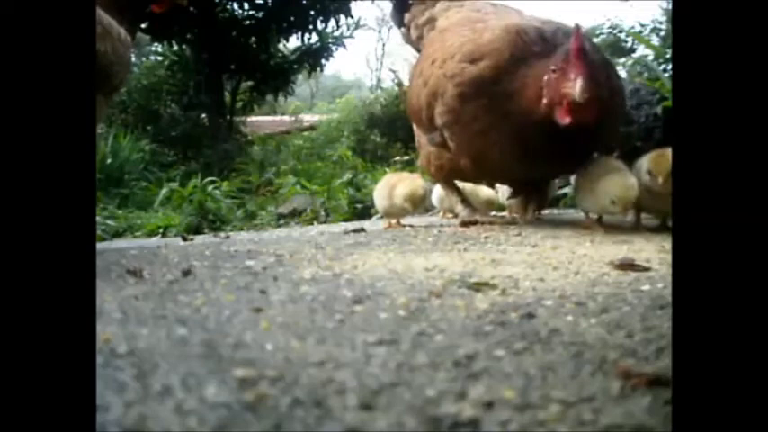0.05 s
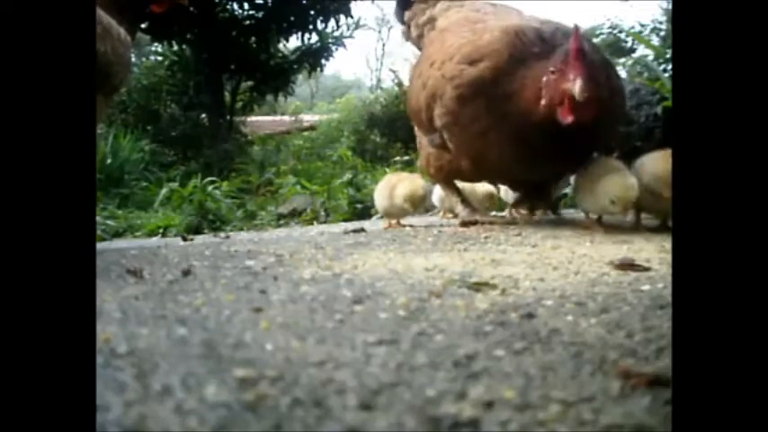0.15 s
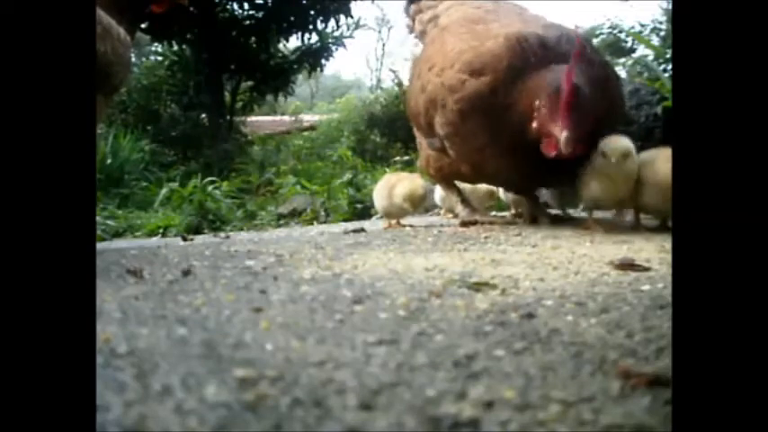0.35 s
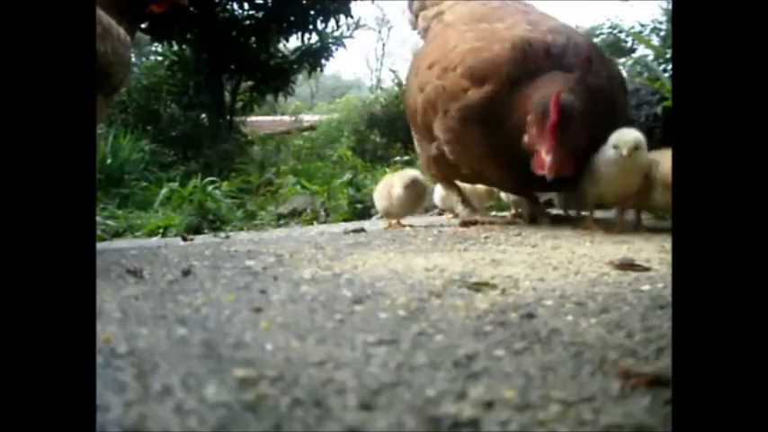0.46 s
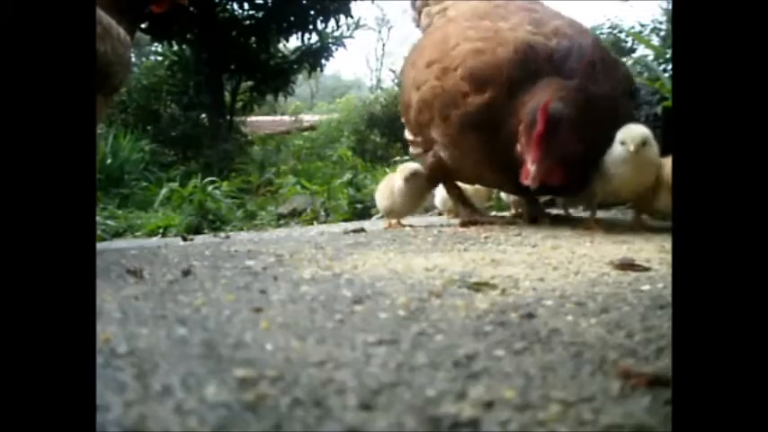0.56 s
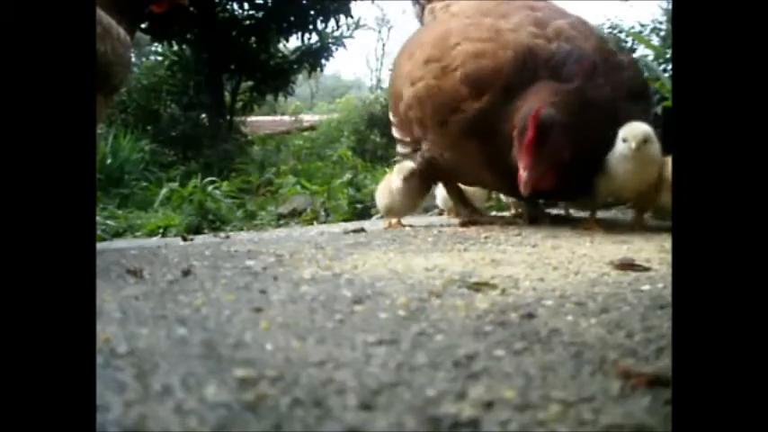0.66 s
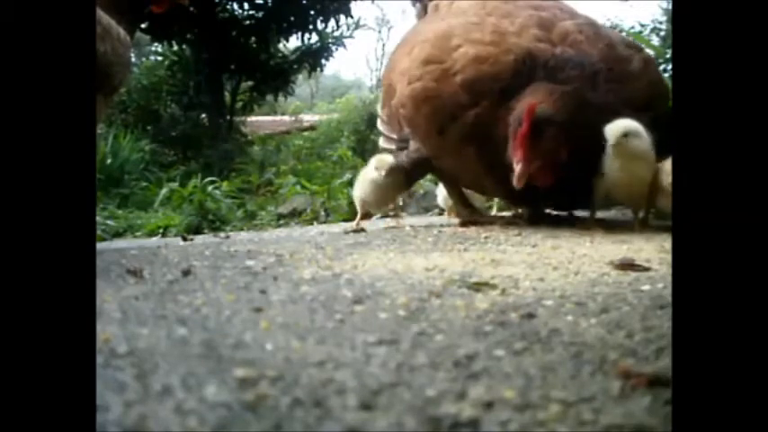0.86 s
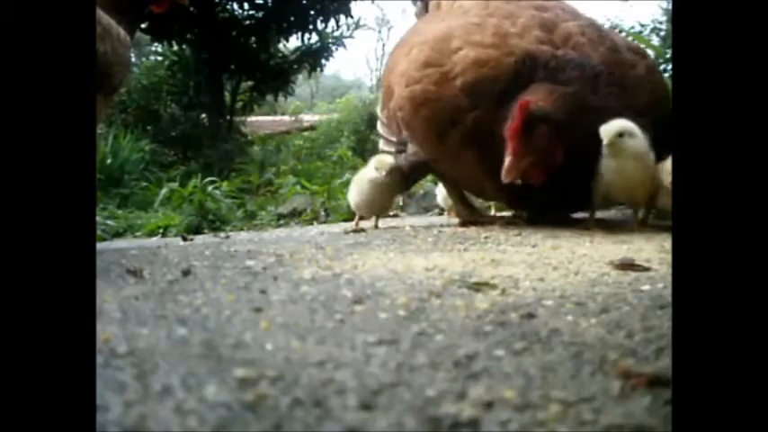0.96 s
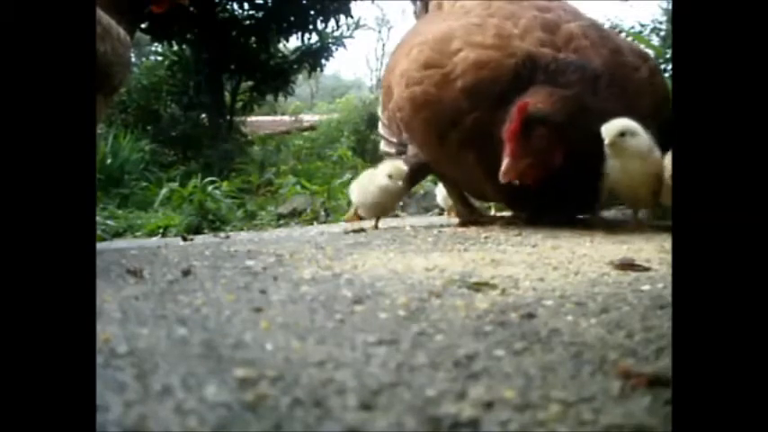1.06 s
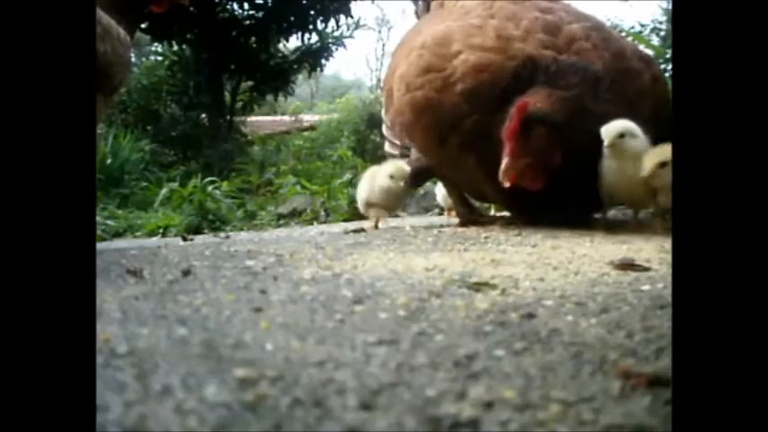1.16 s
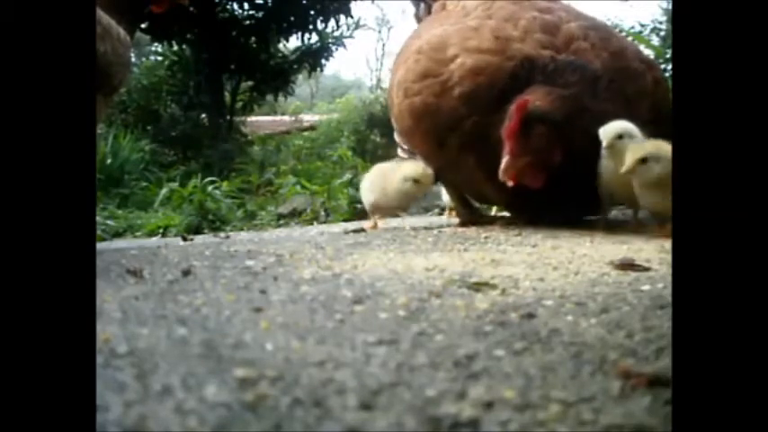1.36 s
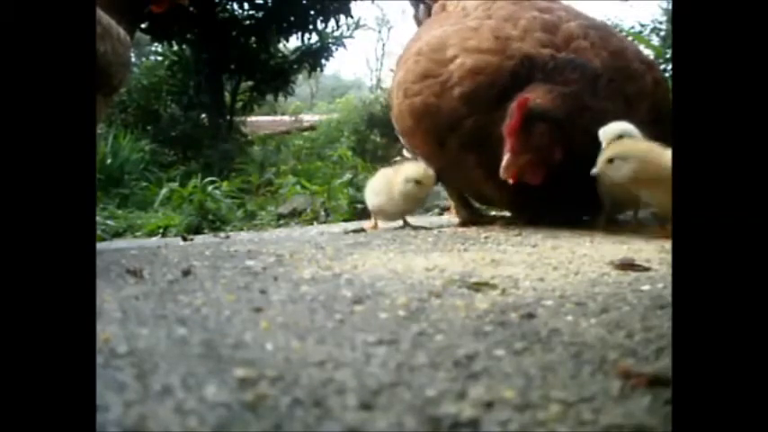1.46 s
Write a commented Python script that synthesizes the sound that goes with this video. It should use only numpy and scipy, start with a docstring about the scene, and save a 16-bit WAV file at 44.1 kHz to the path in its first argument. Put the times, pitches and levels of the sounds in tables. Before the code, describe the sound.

One loud, raspy hen squawk, followed by faint chick peeps and a quick cluck.

```python
"""Over a garden's steady hush a hen murmurs softly, and a beak taps the concrete yard.
She gives one loud, harsh squawk: a short clear note, then a fluttering cry that sinks into a rasp as
her voice turns from periodic to chaotic vibration. After another tap her chicks peep in nearly pure
gliding tones, and she clucks once among them. A wall returns one faint echo, and a small
narrow-band recorder close by on the ground cuts the treble."""
import sys
import numpy as np
from scipy import signal
from scipy.fft import rfft, irfft
from scipy.io import wavfile
from scipy.ndimage import uniform_filter1d

SR = 44100
rng = np.random.default_rng(int(sys.argv[2]) if len(sys.argv) > 2 else 0)


def int16_out(signal):
    """Quantize to a 16-bit WAV file."""
    q = np.round(np.clip(np.atleast_2d(signal).T, -1, 1) * 32767)
    wavfile.write(sys.argv[1], SR, q.astype(np.int16))


N = 66150
TIME = np.arange(N) / SR
RECORDER_RATE_HZ = 8000


def from_db(db):
    """Amplitude ratio of a level in decibels."""
    return 10 ** (np.asarray(db) / 20)


def unit_rms(x):
    """Normalisation to unit mean power."""
    return x / np.sqrt(np.mean(x ** 2) + 1e-20)


def in_time(rows):
    """Linear interpolation of each column over time."""
    times, *columns = np.transpose(rows)
    return [np.interp(TIME, np.sort(times), column) for column in columns]


def during(rows):
    """Rectangular window: one while a curve lasts, zero outside it."""
    return (TIME >= rows[0][0]) & (TIME <= rows[-1][0])


def butter(x, hz, kind, order=2):
    """Causal Butterworth filter."""
    return signal.sosfilt(signal.butter(order, hz, kind, fs=SR, output="sos"), x + 1e-18)


def drift(hz):
    """Random fluctuation: low-passed noise of rms 1."""
    return unit_rms(butter(rng.standard_normal(2 * N), hz, "low")[N:])


def tone(hz):
    """A sinusoid of rms 1 whose phase is the integral of its frequency."""
    return np.sqrt(2) * np.sin(2 * np.pi * np.cumsum(hz) / SR)


def note(rows, jitter):
    """Frequency modulation: a gliding tone wavers at random by a fraction of its pitch."""
    hz, db = in_time(rows)
    return from_db(db) * during(rows) * tone(hz * (1 + jitter * drift(200)))


# Outdoor background spectrum (frequency [Hz], relative spectral density [dB])
GARDEN_SPECTRUM = [(20, -6), (60, -1), (175, 0), (375, -4), (700, -7), (1030, -8), (1550, -10.5),
                   (3000, -11), (4000, -14)]


def garden():
    """Spectrally shaped noise: a steady hush with a low rumble."""
    hz, db = np.transpose(GARDEN_SPECTRUM)
    bin_hz = np.maximum(np.arange(N // 2 + 1) * SR / N, 1)
    shape = from_db(np.interp(np.log(bin_hz), np.log(hz), db)) * (bin_hz < RECORDER_RATE_HZ / 2)
    hush = irfft(rfft(rng.standard_normal(N)) * shape, N)
    return from_db(-43.5) * unit_rms(hush)


# The hen's murmur (time [s], frequency [Hz], level [dB])
MURMUR_CONTOUR = [(.08, 520, -56), (.11, 565, -38), (.128, 685, -53.5), (.155, 560, -45.5), (.18, 540, -52)]


def murmur():
    """Nearly periodic vibration: one soft, unsteady tone."""
    return note(MURMUR_CONTOUR, jitter=0.025)


# Beak impacts on the ground (time [s], initial level before filtering [dB], frequency [Hz])
BEAK_IMPACTS = [(0.2097, -15.5, 600), (0.8564, -25, 1110)]


def pecks(t60_s=0.01):
    """Damped oscillation: each impact gives a dull tap that dies within a few cycles."""
    taps = np.zeros(N)
    for onset, db, hz in BEAK_IMPACTS:
        age = np.maximum(TIME - onset, 0)
        taps += from_db(db - 60 * age / t60_s) * np.sin(2 * np.pi * hz * age)
    return butter(butter(taps, 1390, "low", order=4), 280, "high")


def rasp(centre_hz, width_hz=260):
    """Chaotic vibration, modelled as narrow-band noise around a moving frequency."""
    centred = drift(width_hz) * tone(centre_hz)
    wandering = drift(width_hz) * tone(centre_hz + width_hz / 2 * drift(width_hz))
    return unit_rms(centred + wandering)


def throat(source):
    """Source-filter principle: the throat passes only a narrow middle band."""
    return butter(butter(source, 1422, "low", order=10), 370, "high", order=6)


# The squawk's fundamental (time [s], frequency [Hz])
SQUAWK_FUNDAMENTAL = [(.237, 520.9), (.255, 529.9), (.283, 521.7), (.31, 523.2), (.345, 545.2), (.38, 521),
                      (.41, 502.7), (.44, 481), (.47, 460.2), (.5, 434), (.56, 409.5), (.585, 385)]
# Its envelope before the throat (time [s], level [dB])
SQUAWK_ENVELOPE = [(.2345, -42), (.2365, -19), (.241, -17), (.248, -8), (.26, -8), (.266, -47), (.276, -25),
                   (.286, -10.5), (.309, -5.5), (.318, -9), (.341, -9.5), (.372, -10.5), (.395, -17.5),
                   (.442, -14.5), (.471, -21), (.479, -10.5), (.487, -21.5), (.52, -15), (.555, -17.5),
                   (.564, -11.5), (.576, -31), (.59, -71)]
# Its timbre, with levels relative to the second harmonic (time [s], fundamental [dB], sidebands [dB],
# sideband swing with the flutter [dB], sideband spacing [Hz], rasp [dB], flutter depth [share of pitch])
SQUAWK_TIMBRE = [(.238, -17.5, -5.5, -7, 418.8, -2, 0.0075), (.256, -29.5, -19.5, 3, 382.6, -26, .005),
                 (.29, -26, -17.5, 8.5, 247.4, -13, 0.063), (.31, -31.5, -12.5, 6, 270.3, -20.5, 0.041),
                 (.365, -62, -11.5, 2, 277.4, -18.5, 0.054), (.395, -6, -16.5, -6.5, 301.9, -20.5, 0.026),
                 (.425, -5.5, -26, -9.5, 258.8, -19.5, .025), (.447, -11.5, -7.5, 3.5, 207.3, -3, 0.05),
                 (.49, -8, -7, -1.5, 179.4, -14.5, 0.065), (.52, -22.5, 3, -7, 179.4, -1.5, 0.071),
                 (.57, -26.5, -4.5, -12, 159.7, -10.5, 0.056)]
# The flutter slows as she tires (time [s], rate [Hz])
SQUAWK_FLUTTER = [(.42, 56.7), (.44, 50)]


def squawk(jitter=0.016, shimmer_db=1.74, flutter_db=2.5):
    """Modulation: a fluttering voice, led by its second harmonic, sinks into sidebands and rasp."""
    pitch, = in_time(SQUAWK_FUNDAMENTAL)
    level_db, = in_time(SQUAWK_ENVELOPE)
    fundamental_db, side_db, swing_db, spacing_hz, rasp_db, depth = in_time(SQUAWK_TIMBRE)
    flutter_hz, = in_time(SQUAWK_FLUTTER)
    sounding = during(SQUAWK_ENVELOPE)
    flutter = np.cos(2 * np.pi * np.cumsum(flutter_hz * sounding) / SR)
    hz = pitch * (1 + depth * flutter + jitter * drift(120))
    harmonics = tone(2 * hz) + from_db(fundamental_db) * (tone(hz) + from_db(-8) * tone(3 * hz))

    offset_hz = spacing_hz * (1 + 0.14 * drift(90))
    side_gain = from_db(side_db + swing_db * flutter)
    near_sides = tone(2 * hz - offset_hz) - from_db(-12) * tone(2 * hz + offset_hz)
    far_side = side_gain * from_db(-10) * tone(2 * (hz - offset_hz))
    voice = harmonics + side_gain * (near_sides + far_side) + from_db(rasp_db) * rasp(1.8 * pitch)
    voice /= np.sqrt(uniform_filter1d(voice ** 2, int(0.009 * SR)) + 1e-9)   # even power over 9 ms

    effort = from_db(level_db - level_db.max())
    tremolo_db = flutter_db * np.sqrt(effort) * flutter
    envelope = from_db(level_db + tremolo_db + shimmer_db * drift(150)) * sounding
    air_hiss = unit_rms(butter(rng.standard_normal(N), 3160, "low", order=4))
    edge = from_db(-26) * air_hiss + from_db(-29) * tone(4 * hz)   # brightens the loud part
    return throat(envelope * voice) + envelope * effort * edge


# The chicks' calls, one curve per peep (time [s], frequency [Hz], level [dB])
PEEP_CONTOURS = [
    [(.875, 2480, -64), (.89, 2415, -48), (.908, 2476, -51), (.922, 3600, -43), (.934, 3860, -51),
     (.952, 3450, -54)],
    [(1.07, 3300, -53), (1.09, 3450, -56), (1.11, 3400, -49), (1.123, 3760, -42.5), (1.133, 3760, -45),
     (1.145, 3450, -56)],
    [(1.132, 2450, -42), (1.139, 3300, -45), (1.148, 4020, -40), (1.158, 4150, -62), (1.168, 3930, -45),
     (1.177, 3700, -74), (1.188, 3250, -44), (1.2, 2900, -43.5), (1.213, 2450, -73)],
    [(1.345, 3450, -58), (1.354, 3750, -48), (1.364, 4100, -49.5), (1.372, 3860, -58)],
    [(1.303, 2900, -53), (1.325, 3270, -44.5), (1.342, 3240, -40), (1.35, 3440, -45.5),
     (1.358, 3483, -38.5), (1.372, 3056, -36.5), (1.382, 2700, -46), (1.39, 2540, -59)],
]


def peeps():
    """Frequency glides: each peep is a high, nearly pure tone."""
    return sum(note(contour, jitter=0.014) for contour in PEEP_CONTOURS)


# The hen's cluck (time [s], frequency [Hz], level [dB])
CLUCK_CONTOUR = [(1.211, 680, -31.5), (1.215, 643, -20), (1.219, 780, -18), (1.222, 1028, -23),
                 (1.2245, 1138, -23), (1.23, 876, -18), (1.234, 713, -13.5), (1.24, 763, -40.5),
                 (1.252, 880, -36.5)]


def cluck():
    """Periodic plus chaotic vibration: a quick up-and-down flick of the voice, a little rough."""
    hz, db = in_time(CLUCK_CONTOUR)
    voice = note(CLUCK_CONTOUR, jitter=0.016)
    roughness = from_db(db - 18.5) * during(CLUCK_CONTOUR) * throat(rasp(hz))
    return voice + roughness


def scene(echo_delay_s=0.011, echo_db=-20):
    """Superposition: the birds' direct sound, its reflection from a wall, and the garden."""
    birds = murmur() + pecks() + squawk() + peeps() + cluck()
    wall_echo = from_db(echo_db) * np.interp(TIME - echo_delay_s, TIME, birds)
    return (garden() + birds + wall_echo)[None]


def record(dry, ceiling=0.96):
    """Saturation rounds the peaks, aliasing mirrors the highest peeps, and low-passes cut the top."""
    rounded = dry / (1 + (dry / ceiling) ** 12) ** (1 / 12)
    mirrored = rounded * (1 + 2 * np.cos(2 * np.pi * RECORDER_RATE_HZ * TIME))
    dull = butter(mirrored, 3920, "low", order=12)
    return butter(dull, 4743, "low", order=20)


dry = scene()
out = record(dry)
int16_out(out)
```